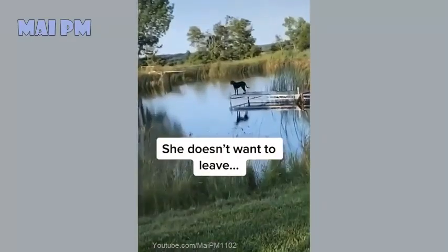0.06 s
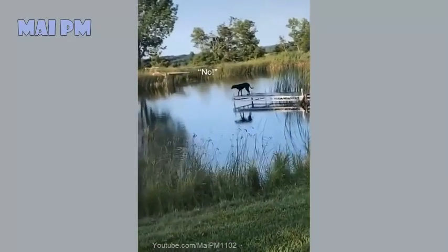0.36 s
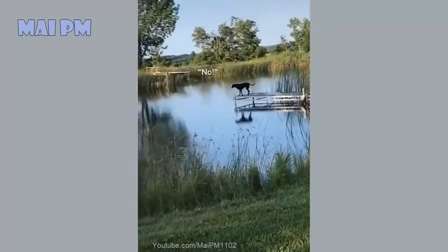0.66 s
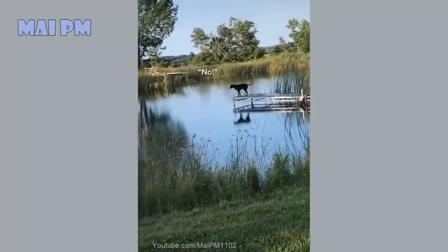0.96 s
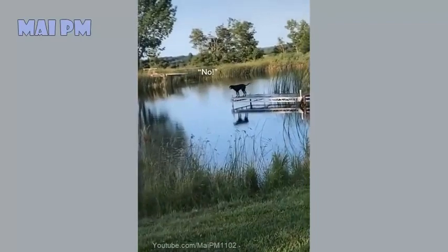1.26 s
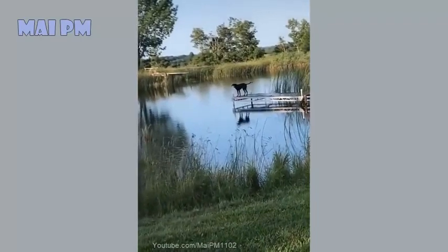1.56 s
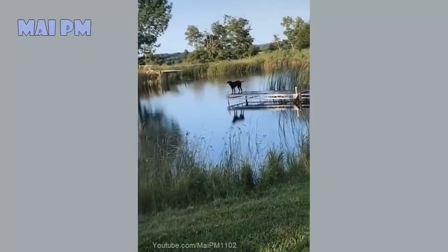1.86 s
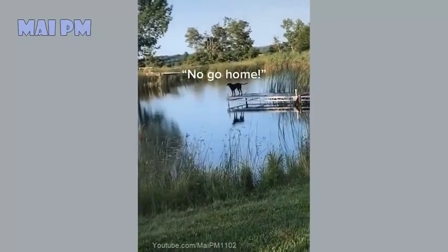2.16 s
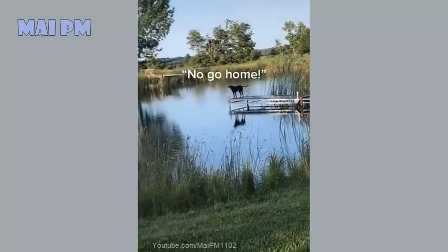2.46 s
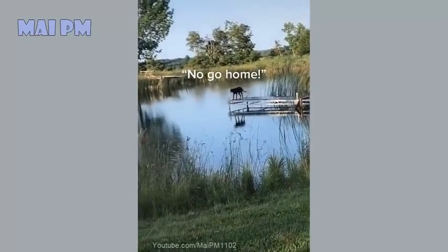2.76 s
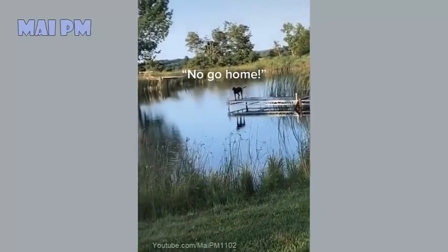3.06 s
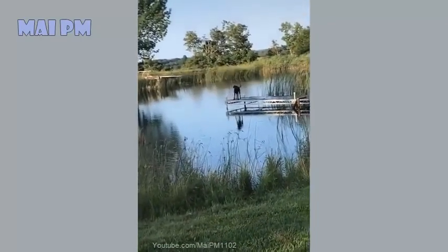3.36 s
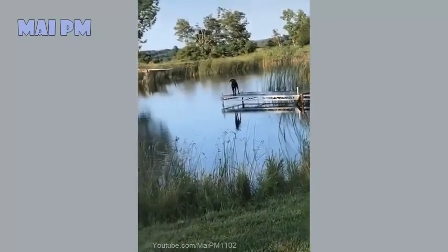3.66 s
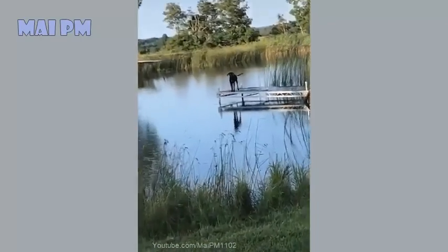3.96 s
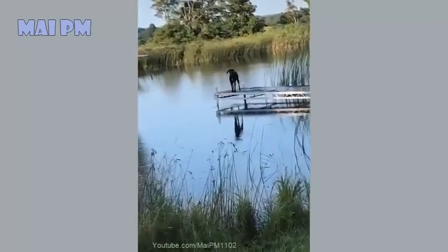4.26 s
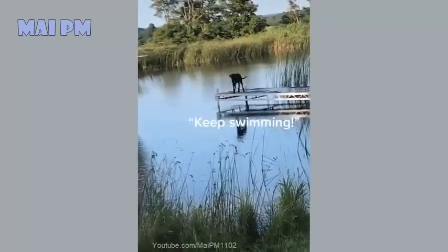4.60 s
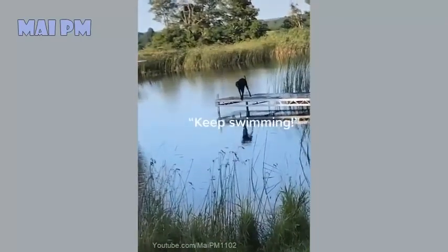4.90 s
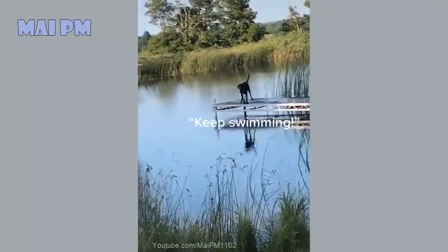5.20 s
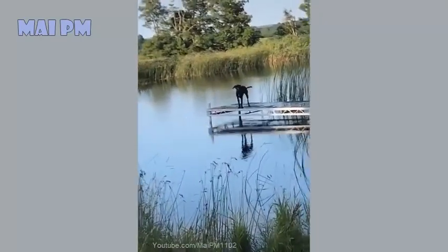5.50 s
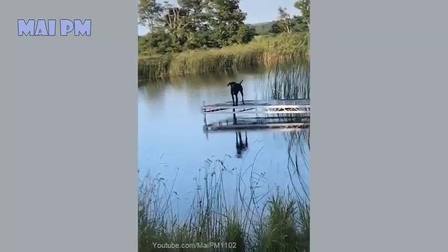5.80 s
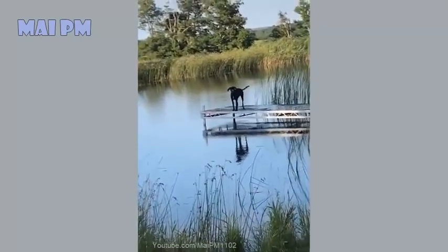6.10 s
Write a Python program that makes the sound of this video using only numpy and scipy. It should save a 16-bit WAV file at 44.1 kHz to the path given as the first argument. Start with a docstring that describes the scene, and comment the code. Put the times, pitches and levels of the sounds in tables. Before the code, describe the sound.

Low wind rumbles and buffets the microphone beside a pond. A large dog, some way off, gives one bark that cracks into a squeal. After a pause it barks three times quickly, then twice more, each hoarse bark echoing lightly off the banks. A small insect chirps high and thin throughout, over very faint birds and distant traffic.

```python
"""A low rumble of wind on the microphone comes first; then a large dog barks six times from a jetty on a
pond, some way off, and the reeds and trees on the banks echo it. By the source-filter principle, rough
vocal folds excite throat and mouth: each bark is a hoarse arch of pitch that clears as it falls away,
and the first cracks into a squeal. A small insect chirps by scraping its wing, over a faint, high
background hiss of insects, distant traffic, far birds and two small ticks."""
import sys
import numpy as np
from scipy import signal
from scipy.fft import rfft, irfft, next_fast_len
from scipy.io import wavfile
from scipy.ndimage import uniform_filter1d

SR = 44100
rng = np.random.default_rng(int(sys.argv[2]) if len(sys.argv) > 2 else 0)


def transcribe(u):
    """Save the signal u as a 16-bit wav file named by the first command-line argument.

    u: samples, shape (n,) or (channels, n), limited to [-1, 1]; the rate is SR.
    q: integer samples, one column per channel.
    """
    v = np.clip(np.atleast_2d(u).T, -1, 1)
    q = np.round(v * 32767).astype(np.int16)
    wavfile.write(sys.argv[1], SR, q)


N = 275352

# spectra of distant traffic, the high background hiss and the ticks: f/Hz, relative level/dB
TRAFFIC_SPECTRUM = [(100, -1), (250, -7), (430, -33.5), (650, -6.5), (790, -1), (870, 5.5), (1080, -11),
                    (1800, -19), (2500, -7.5), (3300, -25), (5000, -48)]
BACKGROUND_HISS_SPECTRUM = [(2500, -6.5), (4000, -12), (5000, -9), (5500, 1.5), (6200, -9.5), (7300, -2),
                            (8200, -3), (10300, -8), (11500, -3.5), (13000, -7)]
TICK_SPECTRUM = [(200, -7), (1500, -1.5), (5000, -15), (10000, -12.5)]
# level of the traffic and of the high background hiss: t/s, level/dB
TRAFFIC_LEVEL = [(0, -71.5), (1.4, -69.5), (2.2, -73.5), (4.3, -72.5), (5.8, -67)]
BACKGROUND_HISS_LEVEL = [(4.3, -64), (5.6, -62)]
# faint ticks close by: t/s, level/dB
TICK_EVENTS = [(3.774, -61.5), (4.633, -60)]
# whistles of far birds: t/s, duration/s, start f/Hz, end f/Hz, relative level/dB
BIRD_CALLS = [(0.08, 0.11, 4600, 4760, -78), (1.592, 0.12, 2310, 2660, -76),
              (2.131, 0.034, 3130, 2750, -75), (2.4, 0.076, 2940, 3200, -77),
              (2.543, 0.071, 4900, 4530, -76), (3.769, 0.072, 2900, 3260, -79),
              (5.38, 0.099, 2815, 2575, -73)]
# insect chirps: t/s, relative level/dB
INSECT_CHIRPS = [(0.1141, -57.5), (0.831, -56.5), (1.1963, -54.5), (1.564, -55), (1.948, -58),
                 (2.3304, -59.5), (2.6753, -58.5), (3.652, -55.5), (4.0236, -57), (4.4035, -54.5),
                 (5.1294, -56.5), (5.508, -56.5), (5.8202, -54.5), (6.1828, -55)]
# breeze on the microphone between gusts: t/s, relative level/dB
BREEZE_LEVEL = [(0.0, -35), (0.62, -36), (1.18, -42.5), (1.51, -41), (1.89, -29), (2.22, -30.5), (2.8, -44),
                (3.01, -44), (3.51, -35.5), (3.94, -39.5), (4.19, -45), (6.24, -53)]
# spectra of the wind's rumble and its brighter buffeting: f/Hz, relative level/dB
RUMBLE_SPECTRUM = [(12, -14), (24, 4.5), (33, 12.5), (55, 9.5), (80, -3), (120, -19.5), (200, -77)]
BUFFET_SPECTRUM = [(50, -19), (95, 7), (140, 0.5), (200, -11.5), (300, -21), (450, -33.5), (800, -50.5),
                   (2000, -113)]
# gusts: t/s, hold/s, rumble level/dB, buffet level/dB
WIND_GUSTS = [(0.318, 0.018, -21.5, -41), (0.41, 0.18, -26, -40.5), (0.672, 0.13, -30.5, -52.5),
              (0.85, 0.039, -26, -39.5), (1.122, 0.076, -32.5, -68), (1.703, 0.16, -29.5, -41),
              (1.877, 0.11, -25.5, -34), (2.045, 0.046, -30, -39), (2.148, 0.03, -32, -42),
              (2.253, 0.093, -29, -40), (2.546, 0.17, -30, -63), (3.371, 0.077, -27.5, -43.5),
              (3.604, 0.058, -26, -46.5), (3.835, 0.06, -30.5, -63.5), (4.005, 0.096, -34, -44.5),
              (4.745, 0.04, -28.5, -51)]
# single eddies that slap the microphone: t/s, peak level/dB, half length/s
EDDY_SLAPS = [(0.862, -23.5, 0.0029), (1.896, -23.5, 0.0011), (1.902, -28.5, 0.00079),
              (1.927, -30, 0.00088), (2.048, -18, 0.0023), (2.093, -41, 0.00064), (2.26, -41, 0.0022),
              (2.331, -45, 0.00054), (4.012, -30, 0.002), (4.777, -26, 0.0051)]
# reflections off the banks: delay/s, relative level/dB
BANK_ECHOES = [(0.085, -26.5), (0.156, -26.5), (0.205, -38.5)]
# colour of the echoes: f/Hz, gain/dB
ECHO_SPECTRUM = [(250, 15.5), (550, -10.5), (900, -2), (1200, 8), (1450, -4), (2500, -8), (8000, -7.5)]
# the echo is fuller or thinner as the dog turns: t/s, gain/dB
ECHO_GAIN = [(1, 4), (2.8, 0), (5.1, 3)]
# the squeal in the first bark: t/s, f/Hz, level/dB
SQUEAL_CONTOUR = [(0.417, 791, -58), (0.419, 793, -32.5), (0.426, 838, -40.5), (0.43, 1165, -29.5),
                  (0.444, 1183, -28.5), (0.448, 1266, -33.5), (0.456, 1230, -56)]
# resonances of throat and mouth, and of air rushing past the teeth, one list a bark:
# f/Hz, width/Hz, gain/dB
TRACT_MODES = [
    [(545, 160, -6), (920, 97, 4), (1507, 12, -3.5), (1610, 7.8, -8), (1987, 22, -6.5), (2320, 47, -8)],
    [(584, 38, -3.5), (914, 20, 4.5), (1443, 15, 1), (1940, 130, -6), (2325, 59, -3), (2540, 60, -1.5)],
    [(512, 20, -10), (828, 12, 2.5), (1306, 44, -13), (1720, 310, -19.5), (1990, 37, -13.5),
     (2210, 84, -16)],
    [(536, 20, -5), (779, 91, 2), (1280, 200, -6.5), (1830, 50, -6), (2230, 47, -3.5)],
    [(591.8, 240, -6.5), (938, 42, 3), (1415, 74, -0.5), (2080, 400, -6.5), (2392, 51, -3)],
    [(526, 68, -2), (860, 125, 2), (1220, 23, -1.5), (1373, 31, -7.5), (1930, 22, -8.5), (2220, 120, -9)],
]
TEETH_MODES = [
    [(4500, 730, -4), (7240, 2300, -1), (8950, 500, -3), (11500, 200, -2)],
    [(4580, 590, -2.5), (5890, 350, 1), (6600, 600, 1.5), (8270, 350, 8)],
    [(4600, 800, -9.5), (5853, 690, -10), (7180, 220, 6), (8500, 700, -1)],
    [(4080, 700, -14), (5780, 64, 7.5), (7550, 380, 2), (8850, 220, 0.5)],
    [(4533, 1000, -9), (6010, 290, 2.5), (6698, 278, 2), (8160, 500, 2)],
    [(4750, 430, 3.5), (5570, 460, 2.5), (6840, 640, 4.5), (8740, 700, -1)],
]
# barks: t/s, attack/s, hold/s, release/(dB/s), level/dB, first f/Hz, top f/Hz, clear tone level/dB,
# then relative gains: mouth wide/dB, mouth relaxed/dB, hiss/dB, palate/dB
BARK_EVENTS = [(0.409, 0.036, 0.054, 289.5, -30.5, 560, 590, -44, 6, -3, -18.5, -5),
               (2.751, 0.064, 0.02, 289.5, -28, 500, 562, -44, 3, -4.5, -13, -10),
               (2.971, 0.042, 0.055, 265, -31.5, 330, 518.3, -44, -12.5, -8, -15.5, -8),
               (3.19, 0.048, 0.02396, 240, -35.5, 430.3, 530.2, -41.5, -10, -6, -10, -15.5),
               (4.742, 0.045, 0.032, 320.5, -29, 480, 583, -43, -0.5, -2, -11, -11.5),
               (4.991, 0.052, 0.058, 292.5, -30, 300, 539, -42, -7, -8.5, -18, -4)]

EDDY_HZ, EDDY_DB = 15.3, 4.2  # passing eddies make the rumble swell and sag
GUST_ATTACK_S, GUST_RELEASE_S = 0.02, 0.012  # time constants
ONSET_DB, SPENT_DB = 27, 42  # a bark starts and ends this far under full effort
FULL_ROUGH, CLEAR_BELOW_DB = 0.793, 21  # roughness (0-1) at full effort; the drop that clears the voice
DB_PER_OCTAVE, SAG_CURVE = 44, 0.8  # pitch sinks as the effort fades, fastest at first
FUNDAMENTAL_FOLLOW, HISS_FOLLOW = 0.41, 0.88  # dB that these lose for each dB of effort
THROB_HZ, THROB_DB = 55, 1.0  # the push is uneven
JAW_RELAX_S = 0.019  # the jaws relax over this time, once the attack is over


def undb(db):
    """Amplitude ratio of a level in decibels."""
    return 10 ** (np.asarray(db) / 20)


def unit(x):
    """Normalisation to rms 1."""
    return x / np.sqrt(np.mean(x ** 2) + 1e-18)


def curves(rows):
    """Linear interpolation of a table's columns over time."""
    times, *columns = np.transpose(rows)
    return [np.interp(np.arange(N) / SR, times, column) for column in columns]


def gate(start, end, fade):
    """Trapezoidal window between two times."""
    t = np.arange(N) / SR
    return np.clip((t - start) / fade, 0, 1) * np.clip((end - t) / fade, 0, 1)


def steady(x, seconds):
    """Division by the running rms holds the short-term level at 1."""
    size = max(int(seconds * SR / 2), 2)
    power = uniform_filter1d(uniform_filter1d(x ** 2, size), size)
    return x / np.sqrt(np.abs(power) + 1e-12)


def walk(rate):
    """Low-pass random modulation of rms 1 that changes about rate times a second."""
    size = next_fast_len(N)
    f = np.arange(min(int(4 * rate * size / SR) + 2, size // 2)) * SR / size
    real, imag = rng.standard_normal((size // 8, 2))[:len(f)].T
    return unit(irfft((real + 1j * imag) / (1 + (2 * f / rate) ** 4), size)[:N])


def colour(x, points):
    """Spectral weighting by (f/Hz, gain/dB) points."""
    hz, db = np.transpose(points)
    f = np.arange(N // 2 + 1) * SR / N
    return irfft(rfft(x) * undb(np.interp(np.log(f + 1), np.log(hz), db)), N)


def noise(points):
    """Gaussian noise of a given spectrum, rms 1."""
    return unit(colour(rng.standard_normal(N), points))


def band(x, low_hz, high_hz, order):
    """Butterworth band-pass filter."""
    return signal.sosfilt(signal.butter(order, [low_hz, high_hz], "band", fs=SR, output="sos"), x)


def resonate(x, modes, damping_hz, sign):
    """Parallel resonators, damped by soft walls; sign -1 joins them smoothly, +1 leaves notches."""
    out = 0
    for k, (hz, width, db) in enumerate(modes):
        b, a = signal.iirpeak(hz, hz / (width + damping_hz), fs=SR)
        out += sign ** k * undb(db) * signal.lfilter(b, a, x)
    return out


def traffic_and_hiss():
    """Incoherent sources sum to noise: far traffic and a faint, high background hiss of insects."""
    traffic_db, = curves(TRAFFIC_LEVEL)
    hiss_db, = curves(BACKGROUND_HISS_LEVEL)
    traffic = noise(TRAFFIC_SPECTRUM) * undb(traffic_db + 0.18 * walk(1.1))
    hiss = noise(BACKGROUND_HISS_SPECTRUM) * undb(hiss_db + 0.9 * walk(4))
    return traffic + hiss


def birds():
    """Frequency and amplitude modulation make faint, gliding whistles from the trees tremble."""
    out = np.zeros(N)
    waver = 1 + 0.025 * walk(250)
    for start, length, from_hz, to_hz, db in BIRD_CALLS:
        hz, = curves([(start, from_hz), (start + length, to_hz)])
        phase = 2 * np.pi * np.cumsum(hz * waver) / SR
        out += undb(db) * gate(start, start + length, 0.02) * np.sin(phase)
    return out * undb(5.5 + 2 * walk(60))


def ticks(time_constant_s=0.016):
    """Two dry transients: broadband noise that rises and decays exponentially."""
    t = np.arange(N) / SR
    envelope = sum(undb(db) * np.exp(-np.abs(t - peak) / time_constant_s) for peak, db in TICK_EVENTS)
    return noise(TICK_SPECTRUM) * envelope


def insect(wing_hz=7590, chirp_s=0.096, rise_hz=170, rasp_db=-7, scrape_hz=140):
    """Stridulation: a fast scrape drives a wing resonance that rings just under its pitch at first."""
    t, out = np.arange(N) / SR, np.zeros(N)
    rasp = unit(band(rng.standard_normal(N), 7180, 7900, order=2))
    waver_hz = 40 * walk(198)
    for start, db in INSECT_CHIRPS:
        hz = wing_hz + waver_hz - rise_hz * np.exp(-np.abs(t - start) / 0.0201)
        tone = np.sin(2 * np.pi * np.cumsum(hz) / SR)
        out += undb(db - 7) * gate(start, start + chirp_s, 0.011) * (tone + undb(rasp_db) * rasp)
    return out * (1 + 0.13 * np.sin(2 * np.pi * scrape_hz * t))


def wind():
    """Turbulent pressure on the microphone: large eddies rumble, gusts add buffets and single slaps."""
    t = np.arange(N) / SR
    breeze_db, = curves(BREEZE_LEVEL)
    breeze = undb(breeze_db + 2 + EDDY_DB * walk(EDDY_HZ))
    surge, shake = 0, 0
    for start, hold, rumble_db, buffet_db in WIND_GUSTS:
        rise = np.minimum((t - start) / GUST_ATTACK_S, 0)
        fall = np.maximum((t - start - hold) / GUST_RELEASE_S, 0)
        swell = np.exp(rise - fall)
        surge += undb(rumble_db) * swell
        shake += undb(buffet_db) * swell
    buffets = steady(noise(BUFFET_SPECTRUM) * undb(5.2 * walk(89)), 0.1)
    rumble = steady(noise(RUMBLE_SPECTRUM), 0.12)
    out = rumble * np.maximum(breeze, surge) + buffets * (undb(-24.5) * breeze + shake)
    for centre, db, half_length in EDDY_SLAPS:
        u = np.clip((t - centre) / half_length, -10, 10)
        out -= undb(db) * u * np.exp((1 - u ** 2) / 2)  # a push, then a pull
    return out


def bank_echoes(x, t60=0.86, scatter_db=-19):
    """Reflection and scattering: smeared echoes from the banks and a thin tail from the trees."""
    t = np.arange(SR) / SR
    tail = rng.standard_normal(SR) * undb(-60 * t / t60) * (1 - np.exp(-t / 0.0044))
    response = undb(scatter_db) * tail / np.linalg.norm(tail)
    for delay, db in BANK_ECHOES:
        echo = rng.standard_normal(SR) * (t > delay) * np.exp(-np.abs(t - delay) / 0.011)
        response += undb(db) * echo / np.linalg.norm(echo)
    return colour(signal.fftconvolve(x, response)[:N], ECHO_SPECTRUM)


def squeal():
    """Register break: the folds flip briefly into a high, nearly pure tone with a strong octave."""
    hz, db = curves(SQUEAL_CONTOUR)
    phase = 2 * np.pi * np.cumsum(hz * (1 + 0.015 * walk(510))) / SR
    tone = undb(-8.5) * np.sin(phase) + np.sin(2 * phase) + undb(-23.5) * np.sin(4 * phase)
    return unit(tone) * undb(db) * gate(SQUEAL_CONTOUR[0][0], SQUEAL_CONTOUR[-1][0], 0.0016)


def effort(start, attack, hold, release, attack_curve=2.1):
    """Driving pressure of one bark, in dB re full effort: a quick swell, a hold and a steady fall."""
    age = np.arange(N) / SR - start
    swell_db = -ONSET_DB * np.clip(1 - age / attack, 0, 2) ** attack_curve
    return swell_db - release * np.maximum(age - attack - hold, 0)


def vocal_folds(hz, rough, jitter=0.0542, subharmonic_db=-5, turbulence_db=1):
    """Period doubling: driven hard, the folds beat strong and weak by turns and chop a turbulent jet."""
    phase = 2 * np.pi * np.cumsum(hz * (1 + jitter * (rough + 0.2) * walk(540))) / SR
    # a softer closure has weaker overtones
    pulses = sum(np.cos(k * phase) * rough ** ((k - 1) / 2) / np.sqrt(k) for k in np.arange(1, 6))
    subharmonic = undb(subharmonic_db) * np.cos(phase / 2) * (1 + walk(170))
    uneven = 1 + rough * (subharmonic + 0.76 * walk(500))
    flutter = (1 + 0.5 * np.cos(phase)) * undb(3.15 * rough * walk(183))
    jet = unit(band(rng.standard_normal(N), 240, 2270, order=2)) * flutter
    return pulses * uneven + undb(turbulence_db) * rough ** 0.21 * jet, flutter, phase


def dog(closing_db=-3, hoarse_db=2):
    """Source and filter: the folds ring throat and mouth; effort sets level, pitch and roughness."""
    t = np.arange(N) / SR
    efforts = np.array([effort(*bark[:4]) for bark in BARK_EVENTS])
    # one larynx: the strongest push of the moment rules it
    push_db = np.maximum(efforts.max(axis=0), -SPENT_DB)
    ruling_bark = np.array(BARK_EVENTS)[efforts.argmax(axis=0), :8]
    onset, rise_s, _, _, _, first_hz, top_hz, clear_db = ruling_bark.T
    rising_hz = top_hz * (first_hz / top_hz) ** (-push_db / ONSET_DB)
    sinking_hz = top_hz * 2 ** -(np.abs(push_db) / DB_PER_OCTAVE) ** SAG_CURVE
    hz = np.where(t < onset + rise_s, rising_hz, sinking_hz)
    rough = np.clip(FULL_ROUGH * (1 + push_db / CLEAR_BELOW_DB), 0.06, 1)
    source, flutter, phase = vocal_folds(hz, rough)
    air = band(rng.standard_normal(N), 3700, 14000, order=5) * flutter
    spray = unit(band(rng.standard_normal(N), 13000, 15000, order=2) * flutter)
    palate = unit(band(rng.standard_normal(N) * flutter, 2537, 2871, order=4))
    chest = steady(band(source, 187, 370, order=2), 0.0073)  # low growl of the uneven beats
    throb_db, rasp_db = THROB_DB * walk(THROB_HZ), hoarse_db * walk(88)
    # the ordinary voice drops back while the folds squeal
    squealing = gate(BARK_EVENTS[0][0] - 0.01, SQUEAL_CONTOUR[-1][0], 0.014)
    # as the jaws close, little but the falling fundamental and its octave are left
    clear_gain = undb(clear_db + FUNDAMENTAL_FOLLOW * push_db - 23 * squealing) * (push_db > -SPENT_DB)
    clear_tone = unit((np.sin(phase) + undb(-10) * np.sin(2 * phase)) * (1 + 0.59 * walk(110)))
    out = uniform_filter1d(clear_gain, size=600) * clear_tone
    for bark, effort_db, tract, teeth in zip(BARK_EVENTS, efforts, TRACT_MODES, TEETH_MODES):
        start, attack, hold, release, level_db, _, _, _, wide_db, relaxed_db, hiss_db, palate_db = bark
        end = start + attack + hold + SPENT_DB / release
        span = slice(int(start * SR), int(end * SR))
        progress = (t[span] - start) / (end - start)
        jaw_db = np.interp(t[span] - start - attack, [0, JAW_RELAX_S], [wide_db, relaxed_db])
        vowel = resonate(source[span], tract, damping_hz=44.4, sign=-0.97)
        throat = steady(band(vowel, 386, 930, order=4), 0.05) * undb(-18 * squealing[span])
        mouth = steady(band(vowel, 1310, 2410, order=8), 0.034)
        # the palate rings mostly at first, while the lips are drawn back
        mouth += undb(palate_db - 42 * progress) * palate[span]
        mouth *= undb(jaw_db - 5 * progress ** 3 - 17 * squealing[span])
        voice = undb(effort_db[span]) * (throat + mouth + undb(-18.5) * chest[span])
        hiss = steady(resonate(air[span], teeth, damping_hz=0, sign=0.93), 0.0085)
        hiss += undb(-21) * spray[span]
        # the hiss fades with the effort and as the jaws close
        hiss *= undb(hiss_db + HISS_FOLLOW * effort_db[span] + closing_db * progress ** 3 + rasp_db[span])
        out[span] += gate(start, end, 0.0051)[span] * undb(level_db + throb_db[span]) * (voice + hiss)
    return out


def scene():
    """Superposition of the dog, its echoes and the sounds of the pond, in one channel."""
    barks = dog() + squeal()
    echo_db, = curves(ECHO_GAIN)
    echoes = bank_echoes(barks * undb(echo_db))
    return (barks + echoes + wind() + insect() + birds() + ticks() + traffic_and_hiss())[None]


def record(dry, cutoff_hz=13150):
    """Band limiting: a steep elliptic low-pass removes the highest treble."""
    return signal.sosfilt(signal.ellip(10, 0.2, 70, cutoff_hz, fs=SR, output="sos"), dry)


dry = scene()
out = record(dry)
transcribe(out)
```